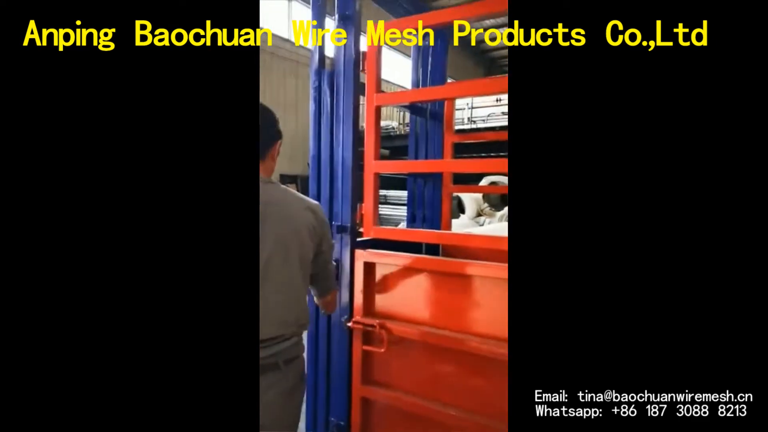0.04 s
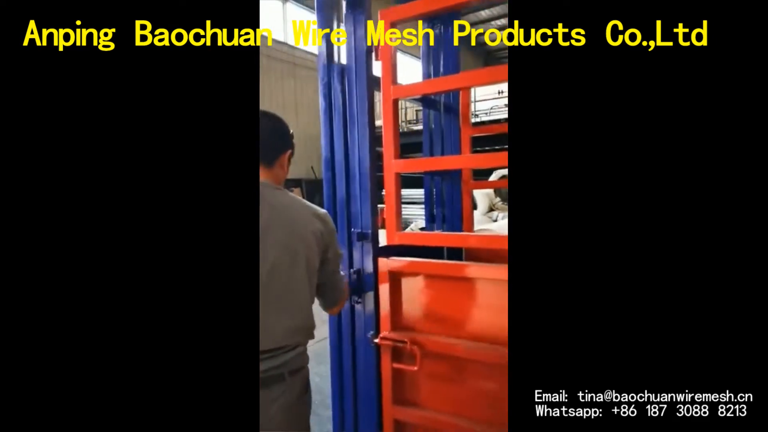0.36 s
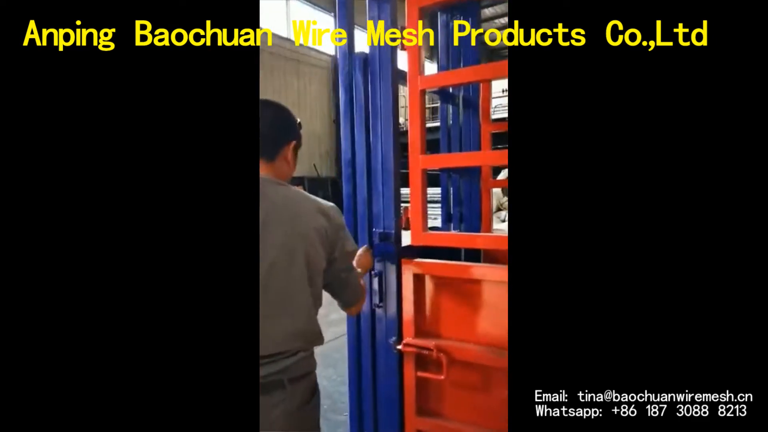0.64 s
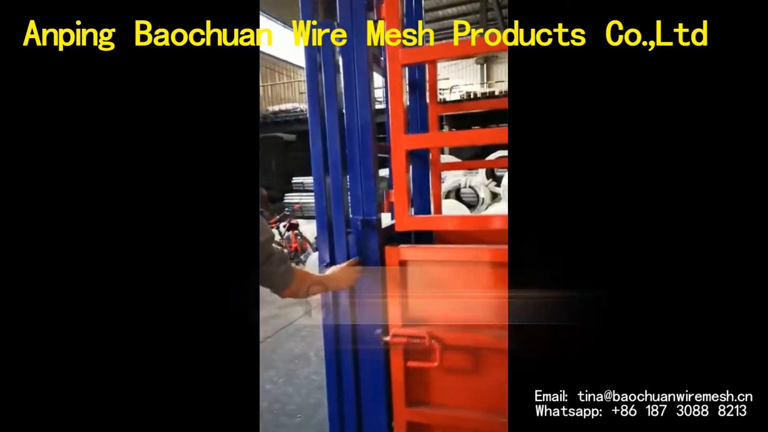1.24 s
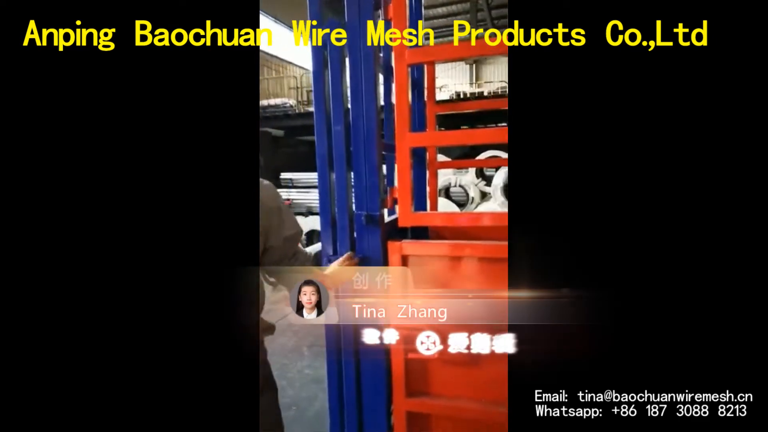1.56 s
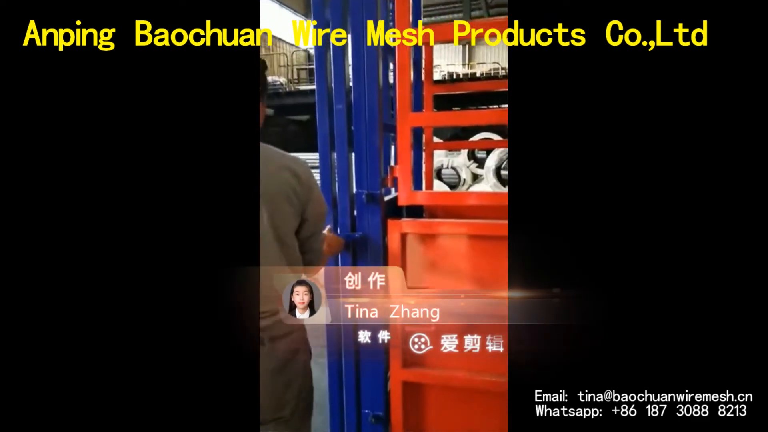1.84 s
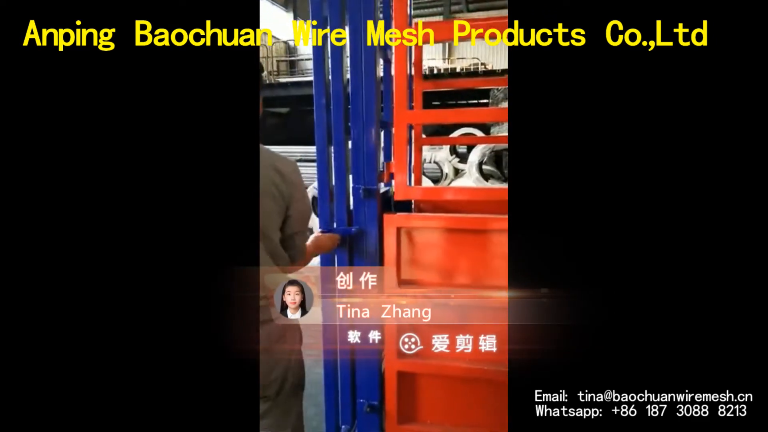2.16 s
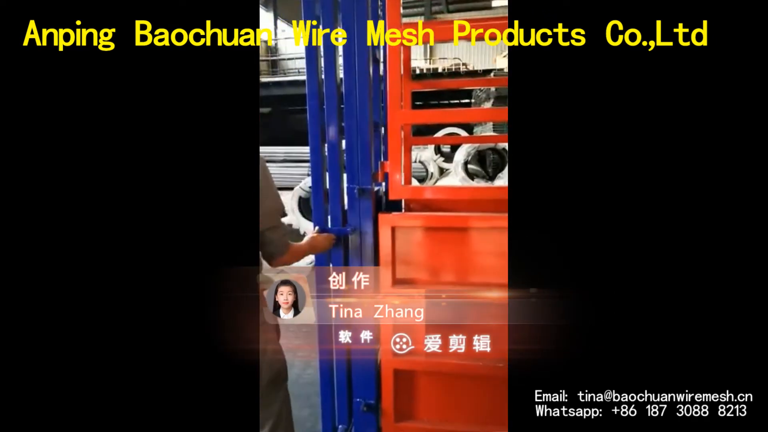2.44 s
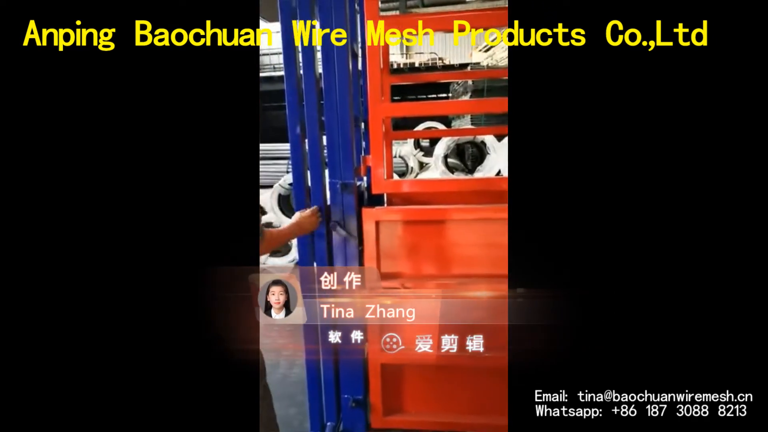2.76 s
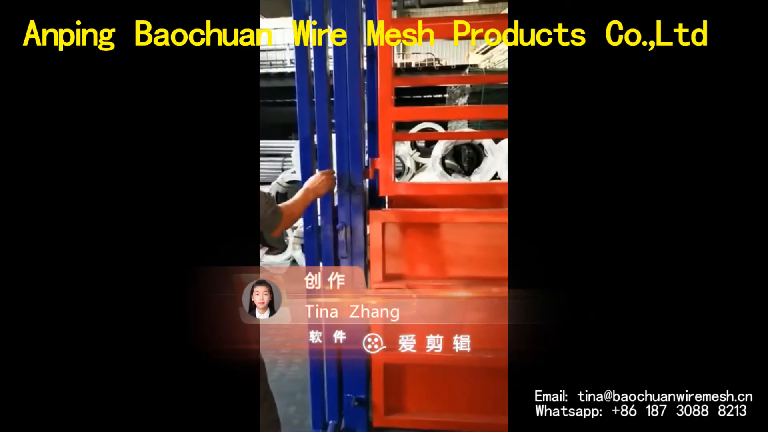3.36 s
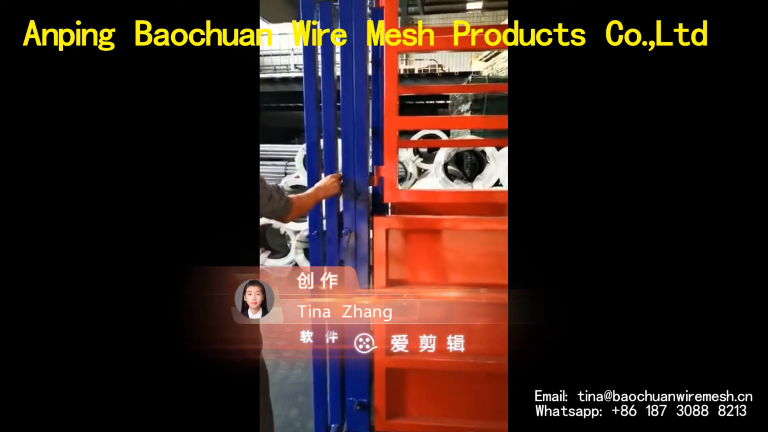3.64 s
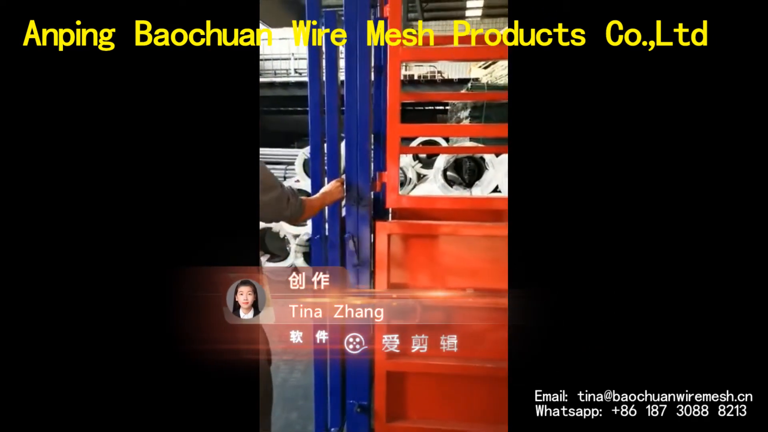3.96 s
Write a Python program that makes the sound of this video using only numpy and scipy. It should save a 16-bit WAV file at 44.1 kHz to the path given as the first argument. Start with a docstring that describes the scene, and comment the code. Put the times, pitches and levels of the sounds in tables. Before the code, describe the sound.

Ringing metal clanks from a steel gate and its bolt in a noisy workshop.

```python
"""A steel gate is swung and latched close by, in a large workshop.
Each blow clanks, bounces and leaves the bars and the hollow frame ringing in the hall.
Thin, fuzzy whistles come and go early on, perhaps a distant grinder; later the hinge or bolt squeals.
The bolt scrapes in its guide, and machines drone behind.
A jet of air hisses on the left; it drops after the first loud blow and stays quieter."""
import sys
import numpy as np
from scipy import signal
from scipy.fft import rfft, irfft
from scipy.io import wavfile
from scipy.ndimage import uniform_filter1d

SR = 44100
rng = np.random.default_rng(int(sys.argv[2]) if len(sys.argv) > 2 else 0)


def pcm_store(signal):
    """Save signal as 16-bit PCM."""
    levels = np.round(np.clip(np.atleast_2d(signal), -1, 1) * 32767)
    wavfile.write(sys.argv[1], SR, levels.astype(np.int16).T)


N = 176400
TOP_HZ = 7560  # higher sound is cut off

# Blows on the gate. A "fade" (t60) is the time a sound takes to drop by 60 dB.
# t/s, clank level/dB, clank fade/s, treble tilt/(dB per octave), note f/Hz, note level/dB,
# bar level/dB, frame level/dB, boom level/dB
GATE_BLOWS = [(0.7178, -22, 0.26, 2.5, 2500, -23, -64, -36, -40.5),
              (1.155, -10.5, 0.091, 4, 2470, -13.5, -25, -24, -36),
              (2.2927, -23.5, 0.17, 4.5, 2460, -24, -40.5, -34.5, -40),
              (2.6045, -25.5, 0.23, 1, 1295, -20, -32.5, -42, -62.5),
              (2.6635, -16.5, 0.16, 3, 2700, -14.5, -20.5, -29.5, -61.5),
              (3.807, -20, 0.1, 2, 2243, -2, -47, -28, -39)]
# The latch grazes, bounces and chatters around the blows: t/s, level/dB, note f/Hz, note level/dB
LATCH_BOUNCES = [(0.7106, -27, 3620, -22), (0.726, -26.5, 2550, -18), (0.74, -25, 2630, -18),
                 (1.151, -15, 1970, -20), (1.162, -9.5, 2060, -18.5), (1.1665, -12, 3340, -8),
                 (1.178, -13, 2140, -13.5), (2.298, -34, 2230, -29), (2.314, -31, 2950, -19.5),
                 (2.329, -27.5, 2210, -21), (2.6082, -29.5, 4220, -25), (2.671, -24.5, 2500, -7.5),
                 (2.683, -19, 2330, -8), (2.691, -23.5, 2440, -8.5), (2.701, -17, 2320, -13),
                 (2.73, -27.5, 2310, -19.5), (2.765, -39, 2260, -21.5), (3.813, -14.5, 2450, -10),
                 (3.815, -20.5, 1280, -15), (3.833, -19.5, 2280, -22)]
def gate():
    """The latch strikes and bounces, and each blow sets the bars and the frame ringing."""
    hits, rings = np.zeros((2, 2, N))
    for start, db, t60, tilt_db, note_hz, note_db, bar_db, frame_db, boom_db in GATE_BLOWS:
        peaks_db = 4.5 * np.minimum(drift(N // 2 + 1, size=40), 2)  # each spot stirs other notes
        add(hits, start, clank(db, note_hz, note_db, t60, tilt_db))
        add(rings, start, bar_ring(bar_db, rise_s=.064))
        add(rings, start, frame_ring(frame_db, boom_db, peaks_db))
    add(rings, 2.8, bar_ring(db=-25.5, rise_s=.25))  # the sliding bolt keeps the bars ringing
    for start, db, note_hz, note_db in LATCH_BOUNCES:
        add(hits, start, clank(db, note_hz, note_db, t60=.049, tilt_db=5.5))
    return hits + hall(hits) + rings * amp([[-.8], [.8]])  # the gate stands a little to the right


# The colour of a clank, or how strong it is at each pitch: f/Hz, level/dB
CLANK_COLOUR = [(40, -20.5), (400, -25), (1000, -15), (1400, -6), (1800, -5), (2400, 2), (2900, -5),
                (3400, -5), (4000, -10), (7500, -15)]
# How alike a clank is in the two ears: f/Hz, likeness (1 = the same)
CLANK_LIKENESS = [(300, 0.85), (2000, 0.83), (5000, 0.12)]
def clank(db, note_hz, note_db, t60, tilt_db):
    """Steel hits steel: a noisy crack and one note from the struck part, both gone almost at once."""
    n = 16384
    t = np.arange(n) / SR
    peaks_db = 3 * drift(n // 2 + 1, size=12)
    crack = amp(db - 60 * t / t60) * noise(CLANK_COLOUR, CLANK_LIKENESS, n, tilt_db, peaks_db)
    waver = .4 * np.array([drift(n, size=60), drift(n, size=60)])
    note_t60, attack_s = .024, .0007
    note = amp(note_db - 60 * t / note_t60) * np.sin(2 * np.pi * note_hz * t + waver)
    return np.minimum(t / attack_s, 1) * (crack + note)


# The notes at which the bars ring: f/Hz, level/dB
BAR_NOTES = [(1893, -14), (2023, -7), (2054, 1), (2085, -4), (2121, 0), (2139, -4), (2162, -4), (2231, -5),
             (2263, -4), (2315, -4), (2394, -6), (2479, -7), (2570, -10), (2621, -10)]
def bar_ring(db, rise_s):
    """The bars' notes build up and die away, so close in pitch that together they throb."""
    t = np.arange(2 * SR) / SR
    out, power = np.zeros((2, len(t))), 0
    for hz, note_db in BAR_NOTES:
        t60 = 1.55 * (2285 / hz) ** 1.5  # higher notes die sooner
        gain = amp(note_db + 1.8 * rng.standard_normal())
        ear_phase = 2 * np.pi * rng.random() + .67 * rng.uniform(-1.2, 1, (2, 1))
        waver = .55 * drift(len(t), size=800)
        fade = amp(-60 * np.maximum(t - rise_s, 0) / t60)
        out += gain * fade * np.sin(2 * np.pi * hz * t + ear_phase + waver)
        power += gain ** 2 / 2
    return amp(db) * np.minimum(t / rise_s, 1) * out / np.sqrt(power)


# The bright ring of the hollow frame: f/Hz, level/dB
FRAME_COLOUR = [(300, -40), (700, -15.5), (1100, -5.5), (1400, -5), (1850, -4), (2200, 1.5), (2800, -1),
                (3400, -2.5), (4300, -4), (7500, -31)]
# The low boom of its panels: f/Hz, level/dB
BOOM_COLOUR = [(30, -19.5), (90, -9), (140, -1), (225, -0.5), (310, 0.5), (410, 3.5), (600, -3.5), (900, 1),
               (2000, -22)]
# How long both ring at each pitch: f/Hz, fade/s
FRAME_FADES = [(120, 6.3), (400, 2.4), (1100, 2), (2200, 4.23), (3500, 2.17), (5000, 4.5), (7500, 0.4)]
# How alike the frame is in the two ears: f/Hz, likeness
FRAME_LIKENESS = [(130, 1), (500, 1), (2000, 1), (4000, 0.85), (8000, .05)]
def frame_ring(frame_db, boom_db, peaks_db):
    """The many notes of the frame and panels swell and die; the lowest ring longest."""
    t = np.arange(N) / SR
    frame_rise_s, boom_rise_s = .0018, .0063
    frame = amp(frame_db) * noise(FRAME_COLOUR, FRAME_LIKENESS, peaks_db=peaks_db)
    boom = amp(boom_db) * noise(BOOM_COLOUR, FRAME_LIKENESS, peaks_db=1.3 * peaks_db)
    frame *= 1 - np.exp(-t / frame_rise_s)
    boom *= 1 - np.exp(-t / boom_rise_s)
    hz, times, bands = signal.stft(frame + boom, SR, nperseg=256)
    fade = amp(-60 * times / value_at(FRAME_FADES, hz)[:, None])
    return signal.istft(bands * fade, SR, nperseg=256)[1][:, :N]


# The bolt rubs in its guide: t/s, length/s, level/dB
BOLT_SCRAPES = [(0.749, .16, -32.5), (2.148, 0.21, -40), (2.641, 0.026, -31)]
def scrapes():
    """Steel rubs on steel and stirs the frame, just before or after a knock."""
    out = np.zeros((2, N))
    for start, length, db in BOLT_SCRAPES:
        n = round(length * SR)
        grip = np.sin(np.pi * np.arange(n) / n) * amp(2.5 * drift(n, size=300))
        add(out, start, amp(db) * grip * noise(FRAME_COLOUR, FRAME_LIKENESS, n))
    return out


# Whistles (starting before 1.15 s), then squeals: t/s, length/s, f/Hz, glide/Hz, wobble/Hz, level/dB
THIN_TONES = [(0, 0.29, 1414, 2, 11, -46), (0.08, 0.33, 1894, -33, 6, -47.5), (0, 0.44, 2136, -2, 7.3, -50),
              (0.092, 0.38, 2880, -28, 8, -47.5), (0.195, 0.28, 4080, 40, 12, -45.5),
              (.4, 0.19, 2160, -38, 8, -56), (.44, 0.23, 3870, -32, 13, -48),
              (0.504, 0.26, 2950, 12, 5.2, -42), (.83, .26, 3720, 100, 16, -40),
              (.88, .34, 3090, 50, 13, -39.5), (.9, .22, 2680, 40, 18, -45), (.94, .2, 4060, 0, 18, -46),
              (.92, .16, 5620, 100, 35, -40), (2.736, 0.057, 4240, -20.5, 34, -34),
              (2.856, 0.53, 1230, -5, 3.7, -43.5), (3.087, 0.75, 1234, -6, 2.5, -47.5),
              (3.101, 0.24, 544, 1, 2, -49), (3.296, 1, 763, 3.5, 3, -53.5),
              (3.87, 0.042, 4290, 0, 15, -38)]
def whistles_and_squeals():
    """Fuzzy whistles come and go, perhaps a distant grinder; later the hinge or bolt rubs and squeals."""
    out = np.zeros((2, N))
    for start, length, hz, glide_hz, wobble_hz, db in THIN_TONES:
        progress = np.arange(0, length, 1 / SR) / length
        pitch = hz + glide_hz * (progress - .5) + wobble_hz * drift(len(progress), size=120)
        swell = np.sin(np.pi * progress) * (1 + .35 * drift(len(progress), size=500))
        add(out, start, (amp(db) * np.sqrt(2) * swell * tone(pitch))[None])
    return out


def hall(x, db=-2, t60=.3, echoes_per_s=2000):
    """Quick echoes come back from the floor and nearby steelwork."""
    t = np.arange(SR // 2) / SR
    echoes = rng.standard_normal((3, len(t))) * (rng.random((3, len(t))) < echoes_per_s / SR)
    echoes *= (t > .004) * amp(-60 * t / t60)
    echoes = echoes[:2] + echoes[2]  # each ear gets its own echoes plus a shared set
    echoes /= np.linalg.norm(echoes, axis=1, keepdims=True)
    return amp(db) * signal.fftconvolve(x, echoes, axes=1)[:, :N]


# The drone of the machines: f/Hz, level/dB
DRONE_COLOUR = [(25, -4.5), (60, -0.5), (130, -7.5), (300, -8), (430, -5), (520, -3.5), (680, -7),
                (900, -10), (1400, -1.5), (1800, -0.5), (2400, -6.5), (3400, -1.5), (4600, -9.5),
                (5600, -5.5), (6400, -4.5), (7500, -6)]
# Their whining tones: f/Hz, level/dB
MACHINE_WHINES = [(544, -59.5), (1415, -54), (2137, -59.5)]
# How alike the background is in the two ears: f/Hz, likeness
BACKGROUND_LIKENESS = [(130, 1), (1000, 1), (2000, 0.74), (4000, 0), (8000, 0)]
def machines(drone_db=-39, wobble_hz=13.8):
    """Distant machines blend into a wash of noise with a few wavering tones."""
    out = amp(drone_db) * patchy(noise(DRONE_COLOUR, BACKGROUND_LIKENESS), depth_db=5.5)
    for hz, db in MACHINE_WHINES:
        whine = tone(hz + wobble_hz * drift(N, size=300))
        swell = 1 + .5 * drift(N, size=5000)
        out += amp(db) * unit_level(swell * whine)
    return out


# The hiss of the air: f/Hz, level/dB
HISS_COLOUR = [(1000, -37.5), (1900, -23), (2400, -3.5), (2850, -11.5), (3080, -1), (3400, -7), (3850, -3),
               (4500, -8.5), (5000, -3), (5650, 1), (6400, -1), (7300, 1.5)]
# The hiss drops after the first loud blow and stays quieter: t/s, level/dB
HISS_LOUDNESS = [(0, -26.5), (1.1, -25), (1.6, -30), (2.099, -32), (2.501, -31.5), (3.299, -32.5), (4, -33)]
def air_jet():
    """A jet of air hisses without a break, nearly all in the left ear."""
    level_db = np.interp(np.arange(N) / SR, *np.transpose(HISS_LOUDNESS)) + .5 * drift(N, size=2000)
    hiss = patchy(noise(HISS_COLOUR, BACKGROUND_LIKENESS), depth_db=4)
    return amp(level_db) * amp([[0], [-22.5]]) * hiss


def patchy(x, depth_db):
    """Narrow bands of a noise swell and fade at random, less and less below 600 Hz."""
    hz, _, bands = signal.stft(x, SR, nperseg=2048, noverlap=1536)
    depth_db = depth_db * np.minimum(hz / 600, 1)[:, None]
    swells = rng.standard_normal(bands.shape[1:])
    for _ in range(2):
        swells = uniform_filter1d(uniform_filter1d(swells, size=3, axis=0), size=12, axis=1)
    bands *= amp(depth_db * np.minimum(unit_level(swells), 2))
    return unit_level(signal.istft(bands, nperseg=2048, noverlap=1536)[1][:, :N])


def noise(colour, likeness, n=N, tilt_db=0, peaks_db=0):
    """Stereo noise with a given colour, left-right likeness, treble tilt and fine peaks."""
    hz = np.fft.rfftfreq(n, 1 / SR)
    left, other = rfft(rng.standard_normal((2, n)))
    alike = np.clip(value_at(likeness, hz), -1, 1)
    right = alike * left + np.sqrt(1 - alike ** 2) * other
    level_db = value_at(colour, hz) + tilt_db * np.log2(np.maximum(hz, 1000)) + peaks_db
    gain = amp(level_db) * (hz < TOP_HZ + 100)
    return unit_level(irfft(np.array([left, right]) * gain, n))


def tone(hz):
    """A pure tone that follows a changing pitch."""
    return np.sin(2 * np.pi * np.cumsum(hz) / SR)


def drift(n, size):
    """A smooth random wobble that changes over about size steps."""
    return unit_level(uniform_filter1d(uniform_filter1d(rng.standard_normal(n), size), size))


def amp(db):
    """Turns decibels into a gain."""
    return 10 ** (np.asarray(db) / 20)


def unit_level(x):
    """Scales a signal to an average (rms) level of 1."""
    return x / np.sqrt(np.mean(x ** 2) + 1e-20)


def value_at(table, hz):
    """Reads between a table's rows along a pitch (log-frequency) scale."""
    f, value = np.transpose(table)
    return np.interp(np.log(hz + 1), np.log(f + 1), value)


def add(mix, start, sound):
    """Mixes a sound in at a start time in seconds."""
    part = mix[:, max(round(start * SR), 0):][:, :sound.shape[1]]
    part += sound[:, :part.shape[1]]


def scene():
    """The gate in front of the workshop noise."""
    return gate() + whistles_and_squeals() + scrapes() + machines() + air_jet()


def record(dry, limit_db=-31, cut_share=.11):
    """Gain control turns loud blows down a little and recovers slowly; then the top treble is cut."""
    power_db = 10 * np.log10(signal.lfilter([1 / 900], [1, 1 / 900 - 1], (dry ** 2).mean(0)) + 1e-12)
    fall_db = 10 * np.arange(N) / SR
    peak_db = np.maximum.accumulate(power_db + fall_db) - fall_db  # the held peak sinks 10 dB a second
    ducked = dry / amp(cut_share * np.maximum(peak_db - limit_db, 0))
    low_pass = signal.firwin(1023, TOP_HZ, window=("kaiser", 9), fs=SR)
    return signal.oaconvolve(ducked, low_pass[None], "same")


dry = scene()
out = record(dry)
pcm_store(out)
```